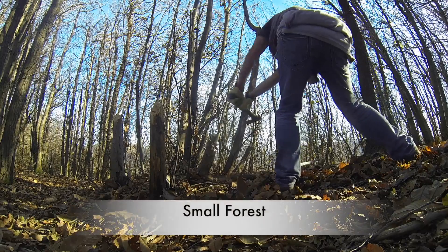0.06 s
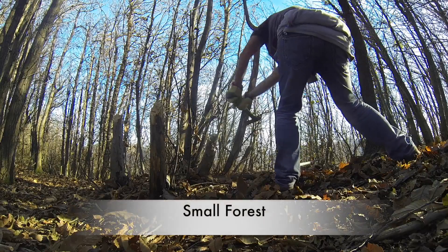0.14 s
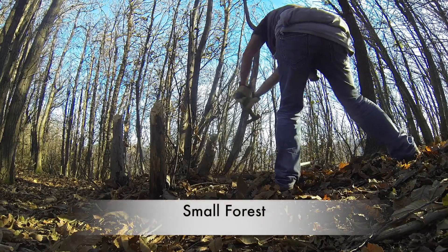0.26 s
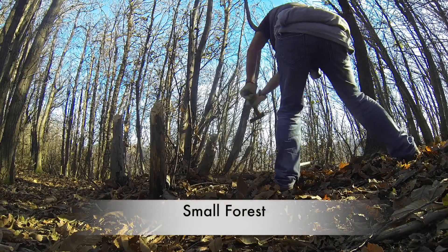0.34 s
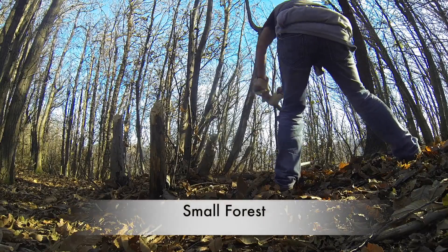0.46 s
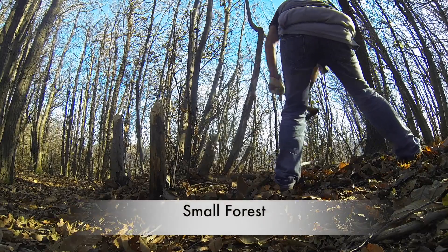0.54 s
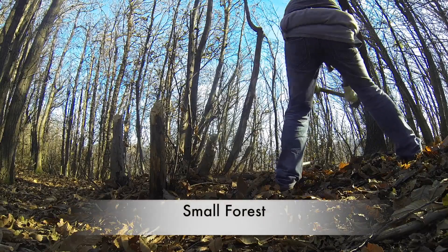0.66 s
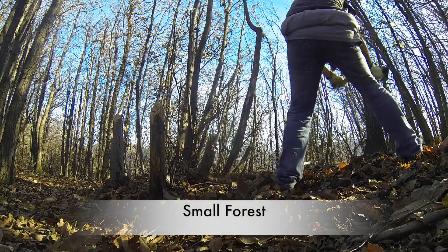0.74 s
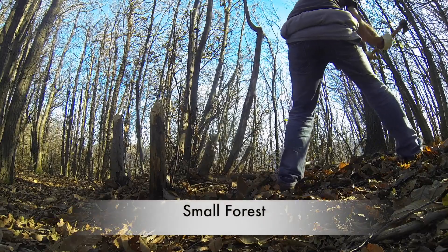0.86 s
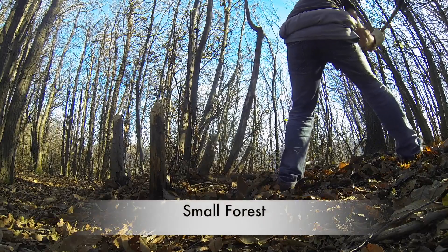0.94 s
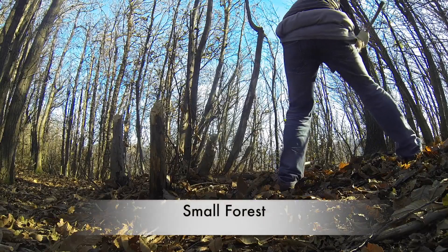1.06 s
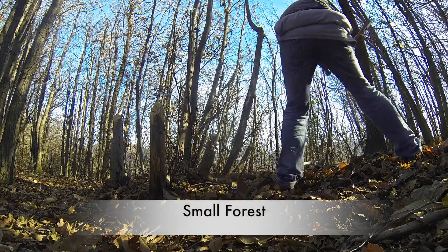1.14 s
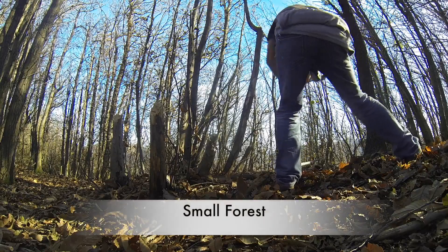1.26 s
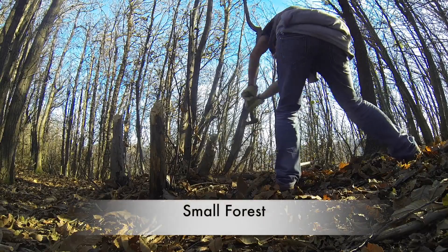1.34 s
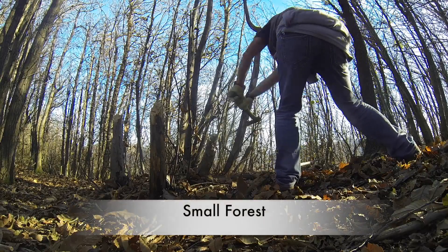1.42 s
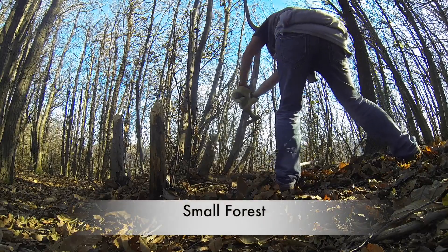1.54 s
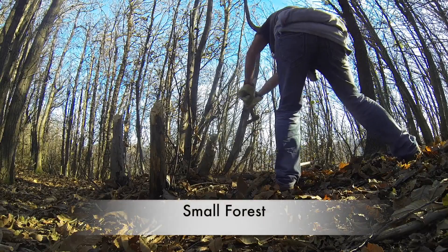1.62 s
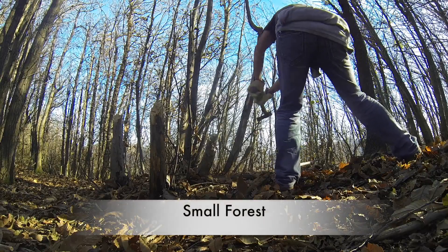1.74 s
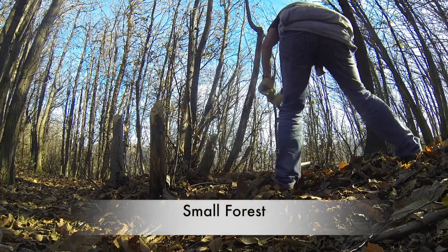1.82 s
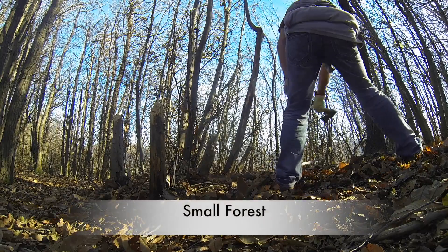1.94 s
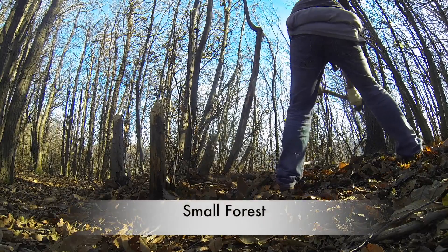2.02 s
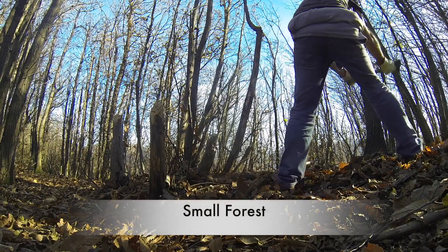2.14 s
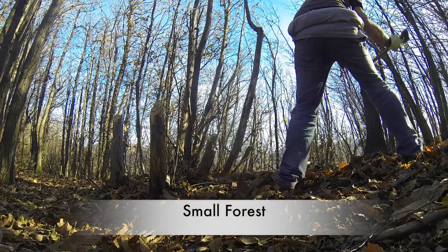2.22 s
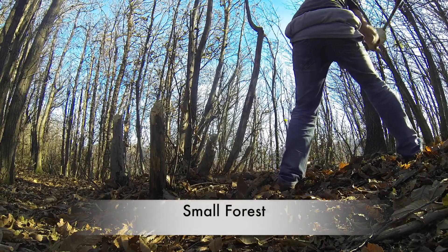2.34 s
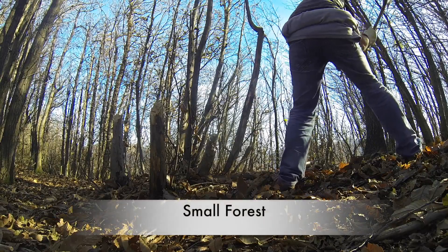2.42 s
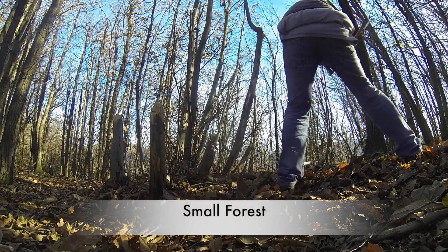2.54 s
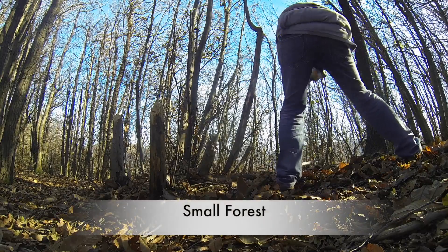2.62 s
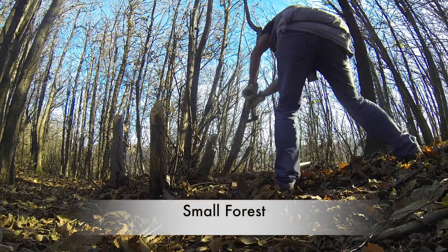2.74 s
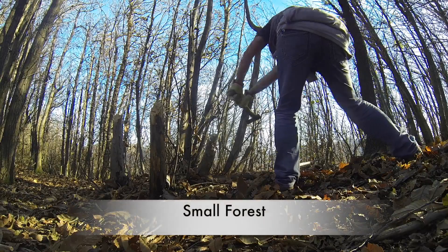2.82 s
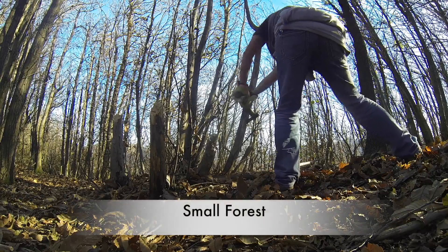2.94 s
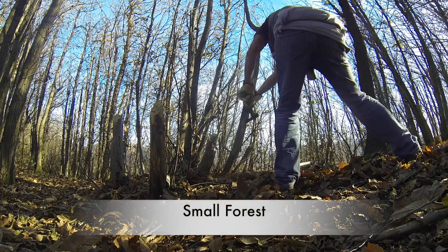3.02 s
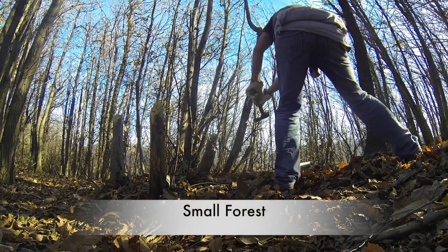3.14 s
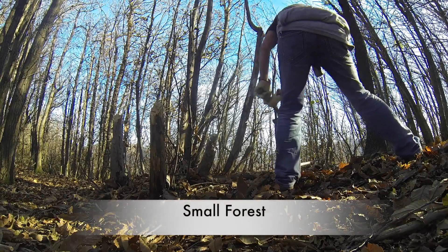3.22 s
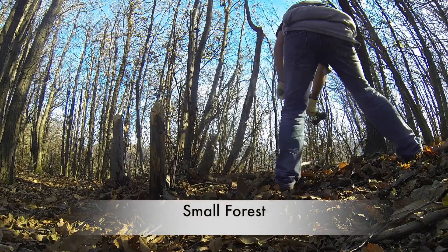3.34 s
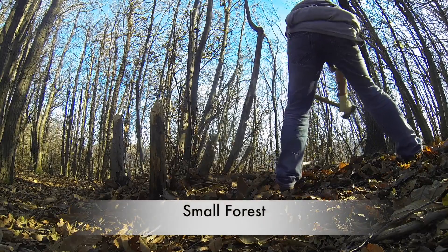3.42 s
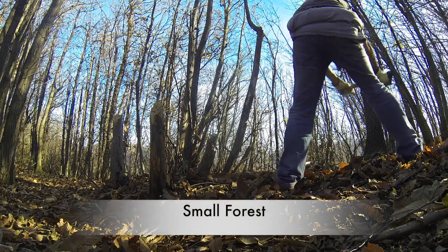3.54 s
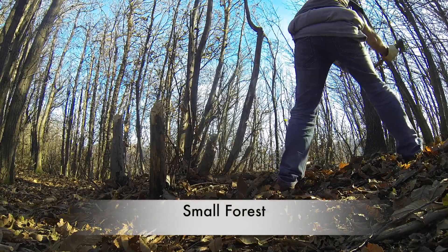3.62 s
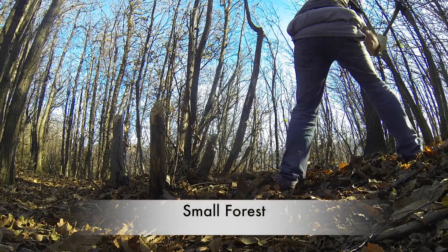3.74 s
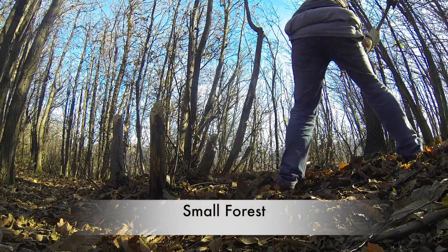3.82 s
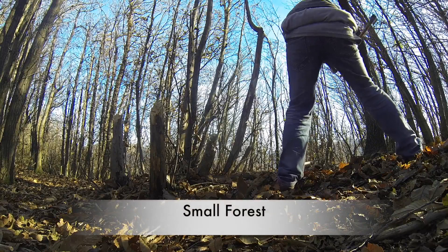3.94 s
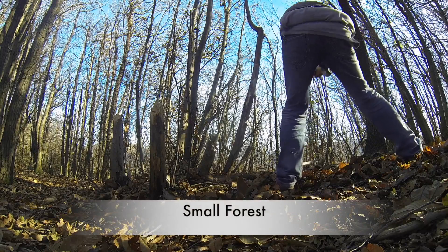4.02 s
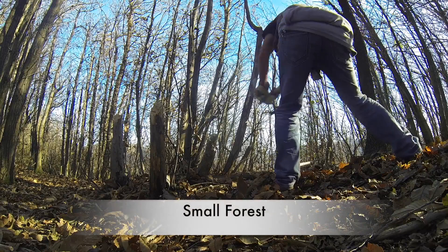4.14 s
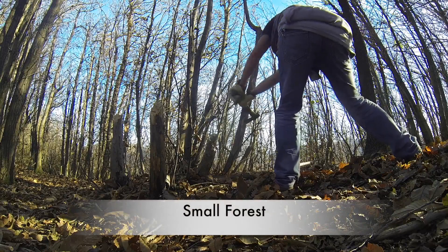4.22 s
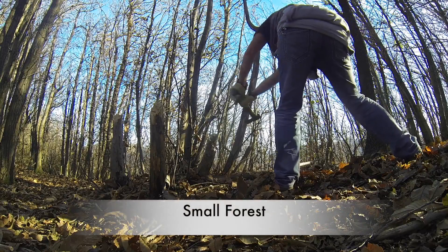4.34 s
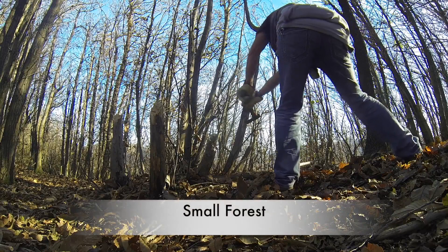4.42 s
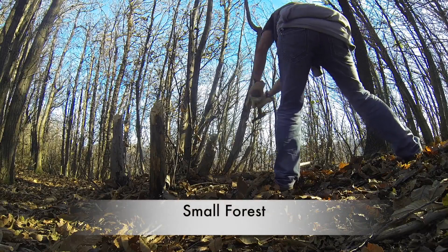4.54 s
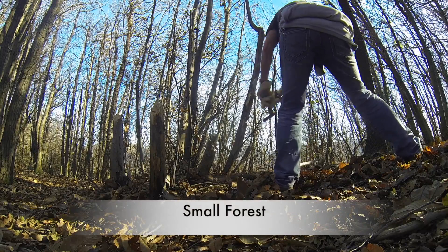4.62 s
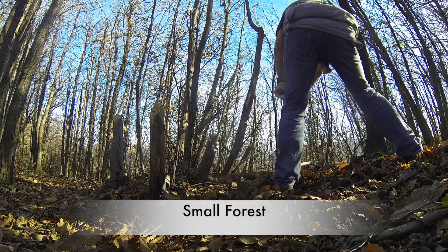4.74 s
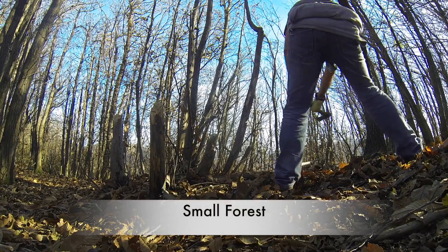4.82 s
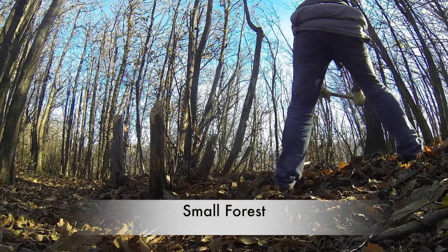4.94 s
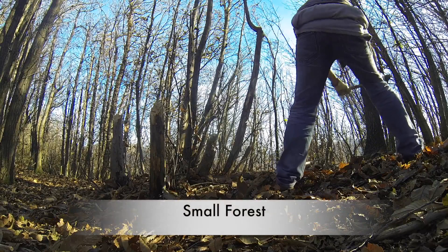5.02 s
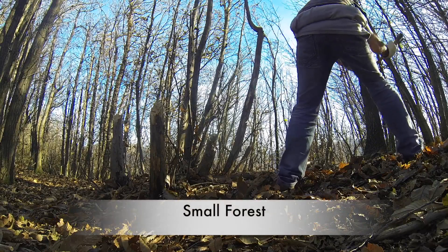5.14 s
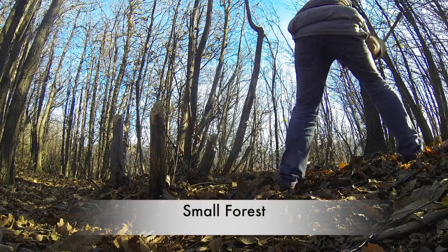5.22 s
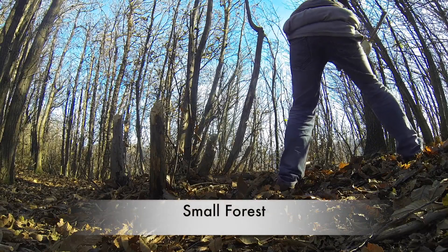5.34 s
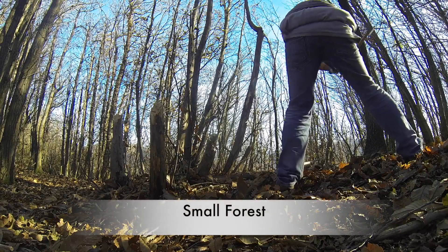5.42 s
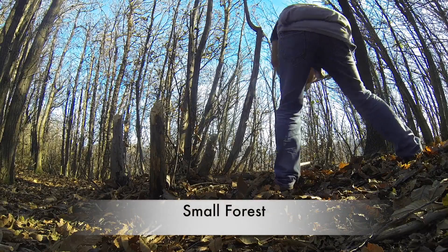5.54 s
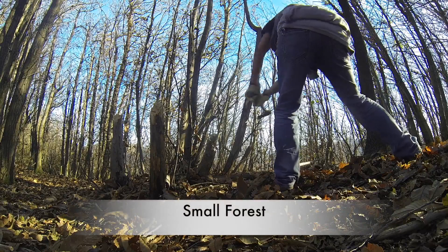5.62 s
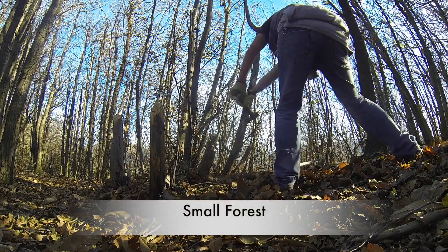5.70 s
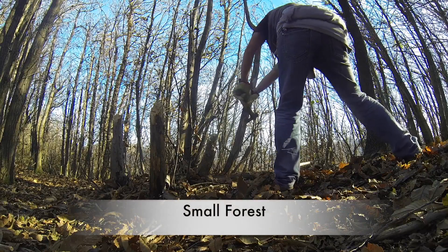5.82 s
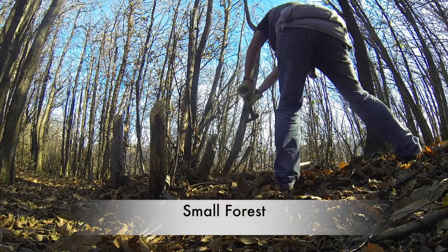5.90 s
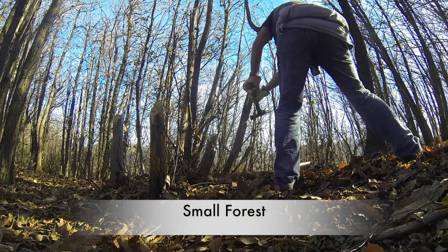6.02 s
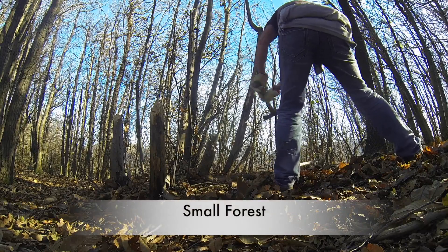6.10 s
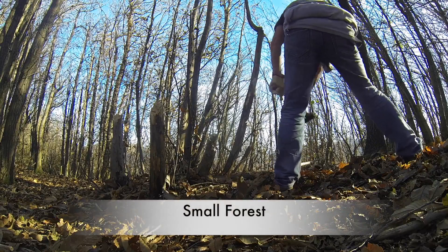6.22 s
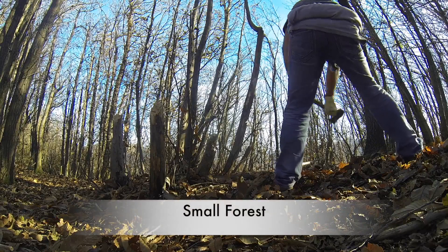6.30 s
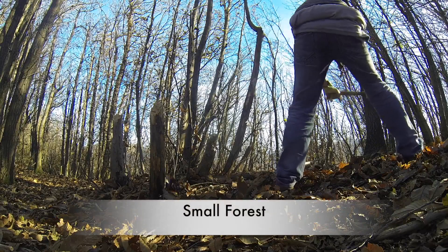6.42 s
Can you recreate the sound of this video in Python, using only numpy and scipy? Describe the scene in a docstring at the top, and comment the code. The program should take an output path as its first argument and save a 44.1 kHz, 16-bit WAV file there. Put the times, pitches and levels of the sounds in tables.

```python
"""Axe in a quiet forest

Five chops into standing wood, heard close by through a small camera's microphone on the ground.
Each bite is a noise burst ringing the cut face; stump and soil thud as decaying sines, and shaped noise dies
among the trunks. Chips, twigs and the handle are clicks through resonances; dry leaves underfoot are crackling noise.
Behind lie a far noise rumble, one faint two-note hoot of sines and a thin sine whine from the camera electronics.
Levels are in dB re full scale as each layer enters the microphone, ahead of housing and top-band losses."""
import sys
import numpy as np
from scipy import signal
from scipy.fft import rfft, irfft, next_fast_len
from scipy.io import wavfile
from scipy.ndimage import uniform_filter1d, map_coordinates

SR = 44100
rng = np.random.default_rng(int(sys.argv[2]) if len(sys.argv) > 2 else 0)


def elevation(decibels):
    """Turn decibel levels (scalar or array-like) into linear amplitude ratios."""
    levels = np.asarray(decibels, float)
    return 10 ** (levels / 20)


def generate_wav(sig):
    """Save sig (samples, or channels by samples) to the path in sys.argv[1] as 16-bit PCM at SR."""
    pcm = np.round(np.clip(np.atleast_2d(sig).T, -1, 1) * 32767).astype(np.int16)
    wavfile.write(sys.argv[1], SR, pcm)


N = 285327  # samples


def unit(x):
    """Scale to rms 1."""
    return x / np.sqrt(np.mean(x ** 2) + 1e-20)


def along(points, hz):
    """Read (Hz, value) points on a log frequency axis."""
    f, v = np.transpose(points)
    return np.interp(np.log(hz + 1), np.log(f + 1), v)


def wobble(rate):
    """A smooth random curve, rate knots a second."""
    knots = rng.standard_normal(int(N * rate / SR) + 4)
    return map_coordinates(knots, [np.arange(N) * rate / SR])


def filtered(x, response):
    """Filter x by a complex response of frequency."""
    n = x.shape[-1]
    m = next_fast_len(n + 8192)
    spectrum = rfft(x, m) * response(np.fft.rfftfreq(m, 1 / SR))
    return irfft(spectrum, m)[..., :n]


def resonance(hz, width):
    """A causal resonance with gain 1 at its centre; width in Hz."""
    return lambda f: 1j * f * width / (hz * hz - f * f + 1j * f * width)


def add(track, s, sound):
    """Mix a sound in at s seconds."""
    part = track[round(s * SR):][:len(sound)]
    part += sound[:len(part)]


# Far rumble below the forest. Each row: frequency in Hz, relative density in dB per Hz.
RUMBLE_COLOUR = [(12, -34.5), (20, -0.5), (70, -0.5), (145, -6.5), (195, -4), (255, -11), (358, -14),
                 (528, -29), (700, -25.5), (910, -37.5), (1540, -120)]
RUMBLE_DB = -51  # rms, before the slow swell


def far_rumble():
    """Low coloured noise from far off, swelling by about 1 dB."""
    rumble = unit(filtered(rng.standard_normal(N), lambda f: elevation(along(RUMBLE_COLOUR, f))))
    return elevation(RUMBLE_DB) * rumble * elevation(wobble(2))


# Camera electronics, right at the microphone: frequency in Hz, middling peak level in dB.
WHINE_TONE = (14050, -79)


def electronic_whine():
    """A thin steady-pitched sine with an unsteady level."""
    hz, db = WHINE_TONE
    return elevation(db + 3 * wobble(25)) * np.sin(2 * np.pi * hz * np.arange(N) / SR)


# Two faint hooted notes. Each row: start in seconds, end in seconds, pitch in Hz, middling rms level in dB,
# rms level of the octave above in dB.
HOOT_NOTES = [(5.153, 5.308, 695, -69.5, -74.5), (5.419, 5.578, 640, -61, -74)]


def hoot():
    """Soft notes: a sine and its octave, faded in and out with a slight tremble."""
    out, t = np.zeros(N), np.arange(N) / SR
    for start, end, hz, db, octave_db in HOOT_NOTES:
        fade = np.clip(np.minimum(t - start, end - t) / 0.034, 0, 1)
        tremble = elevation(1.8 * wobble(30))
        # a sine peaks 3 dB above its rms
        note = elevation(db + 3) * np.sin(2 * np.pi * hz * t)
        note += elevation(octave_db + 3) * np.sin(4 * np.pi * hz * t)
        out += fade * tremble * note
    return out


# Colour of dry leaves at the microphone. Each row: frequency in Hz, relative density in dB per Hz.
LEAF_COLOUR = [(240, -31.5), (400, -4.5), (599, -6), (628, -12), (792, -6.5), (911, -5), (1360, -8.5),
               (2700, -9.5), (3860, -13), (6860, -1), (8390, -0.5), (12800, -19), (14400, -26.5),
               (15600, -37), (16400, -61.5)]
SPLIT_HZ = 4900  # dull leaf noise below, bright above


def leafy_noise(n):
    """Two noises of rms 1 in the colour of dry leaves: the dull part and the bright part."""
    high = lambda f: 1 / (1 + (SPLIT_HZ / (f + 1)) ** 8)
    colour = lambda f: elevation(along(LEAF_COLOUR, f)) * [1 - high(f), high(f)]
    dull, bright = filtered(rng.standard_normal((2, n)), colour)
    return unit(dull), unit(bright)


# Weight shifts on the leaves, a short crunch each. Each row: middle in seconds, half length in seconds,
# dull level in dB, bright level in dB.
FOOT_SHIFTS = [(0.675, 0.017, -51, -47), (1.878, 0.021, -55, -58), (1.943, 0.026, -72, -58.5),
               (2.027, 0.024, -58.5, -56), (3.273, 0.015, -63, -79.5), (3.362, 0.017, -70, -59),
               (6.396, 0.017, -55, -53.5)]
# Leaves underfoot, busy while the axe is pulled free and still at the top of the swing.
# Each row: time in seconds, amount of stir in dB.
LEAF_STIR = [(0.0, -65), (0.16, -65), (0.38, -60.5), (0.85, -58), (0.94, -59.5), (1.08, -67.5), (1.35, -66),
             (1.53, -63.5), (1.84, -64.5), (2.03, -59), (2.47, -67.5), (2.72, -68), (3.03, -54.5),
             (3.13, -56), (3.37, -56.5), (3.89, -68.5), (4.13, -69.5), (4.34, -62.5), (4.56, -62),
             (4.79, -62), (5.24, -66), (5.41, -70), (5.69, -66), (5.82, -62.5), (5.97, -60.5), (6.2, -64),
             (6.47, -63)]
STIR_MID_DB = -63.5  # middling stir
DULL_DB, DULL_GROWS = -62, 0.8  # level at middling stir, dB per dB of stir
BRIGHT_DB, BRIGHT_GROWS = -63.5, 1.1


def rustle():
    """Leaf noise follows the stir and the steps, with crackles of a few ms partly shared by dull and bright."""
    t = np.arange(N) / SR
    stir_db = np.interp(t, *np.transpose(LEAF_STIR)) - STIR_MID_DB + 1.7 * wobble(5.7)
    dull_step, bright_step = np.zeros((2, N))
    for middle, half, dull_db, bright_db in FOOT_SHIFTS:
        shift = np.exp(-((t - middle) / half) ** 2)
        dull_step += elevation(dull_db) * shift
        bright_step += elevation(bright_db) * shift

    rate = 110  # crackles a second in each of three trains
    strength = np.minimum(rng.exponential(size=(3, N)), 3)
    crackles = (rng.random((3, N)) < rate / SR) * strength
    decay = np.exp(-t[None, :800] / 0.0022)
    both, dull, bright = signal.fftconvolve(crackles, decay, axes=1)[:, :N]

    crunch, fizz = leafy_noise(N)
    crunch = unit((1 + 1.1 * both + 0.39 * dull) * crunch)
    fizz = unit((1 + 0.62 * both + 1.1 * bright) * fizz)
    dull_level = elevation(DULL_DB + DULL_GROWS * stir_db + 0.8 * wobble(6.7)) + dull_step
    bright_level = elevation(BRIGHT_DB + BRIGHT_GROWS * stir_db + 0.8 * wobble(29)) + bright_step
    return dull_level * crunch + bright_level * fizz


def contact(t60, colour):
    """A click and a weak ragged scrape, dying five times slower, through a resonance; peak 1."""
    t = np.arange(SR // 8) / SR
    ragged = elevation(2.5 * unit(uniform_filter1d(rng.standard_normal(len(t)), size=60)))
    shape = elevation(-60 * t / t60) + 0.27 * ragged * elevation(-60 * t / (5 * t60))
    onset = 1 - np.exp(-t / 0.00069)
    sound = filtered(shape * onset * rng.standard_normal(len(t)), colour)
    return sound / np.abs(sound).max()


# The handle in the grip at the top of each backswing. Each row: time in seconds, peak level in dB,
# gap to the second knock in seconds, peak level of the second knock in dB.
GRIP_KNOCKS = [(1.065, -34, 0.012, -36), (2.487, -37.5, .016, -39), (3.874, -35.5, .012, -44),
               (5.38, -37.5, 0.023, -45)]
# Resonances of the handle. Each row: frequency in Hz, width in Hz, relative level in dB.
HANDLE_MODES = [(302, 78, 7.5), (995, 170, 4.5), (1750, 370, -3.5), (2660, 260, -1.5), (7200, 4900, -13.5)]
GRIP_T60_S = 0.037  # of the click


def handle_knocks():
    """The handle slides and knocks twice, always with the same wooden resonances."""
    out = np.zeros(N)

    def handle(f):
        modes = enumerate(HANDLE_MODES)
        return sum((-1) ** k * elevation(db) * resonance(hz, width)(f) for k, (hz, width, db) in modes)

    for s, db, gap, second_db in GRIP_KNOCKS:
        start = s - 0.001
        add(out, start, elevation(db) * contact(GRIP_T60_S, handle))
        add(out, start + gap, elevation(second_db) * contact(GRIP_T60_S, handle))
    return out


# Chips and twigs landing in the leaves. Each row: time in seconds, leafy peak level in dB, leafy pitch in Hz,
# woody peak level in dB, woody pitch in Hz.
CHIP_LANDINGS = [(0.212, -23, 7290, -59, 1790), (0.326, -31, 8140, -44, 1210),
                 (0.444, -44, 6940, -52, 1510), (0.636, -36.5, 7740, -42, 1630),
                 (0.668, -33, 7200, -43, 890), (0.77, -33.5, 7900, -34, 4300),
                 (0.869, -50, 7010, -59, 1820), (1.272, -45.5, 7950, -53, 1520),
                 (1.623, -38, 7590, -35, 806), (2.104, -34, 7450, -39, 2850), (2.282, -49, 5340, -48, 3040),
                 (2.323, -63, 7310, -47, 2540), (2.98, -23.5, 7900, -22, 2130),
                 (3.028, -28, 7560, -33.5, 590), (3.083, -33, 7240, -36, 746),
                 (3.217, -26, 8700, -45, 1720), (3.33, -36.5, 7170, -44, 1810),
                 (3.348, -44, 7590, -38.5, 377), (3.516, -35.5, 6750, -62, 1750),
                 (3.645, -46, 5200, -48, 2620), (4.318, -45, 7370, -47.5, 1200),
                 (4.383, -37, 6600, -21, 2010), (4.402, -29, 7200, -30, 2240),
                 (4.452, -25, 7300, -27.5, 2000), (4.481, -51, 7000, -28, 240),
                 (4.495, -53, 7000, -28.5, 258), (4.515, -41, 8100, -48, 1020),
                 (4.675, -30, 6600, -38, 1810), (4.719, -41.5, 6800, -40.5, 2730),
                 (4.788, -40.5, 6700, -48.5, 2050), (5.012, -45.5, 8500, -60, 2500),
                 (5.166, -45.5, 7500, -54, 2500), (5.285, -45.5, 6700, -49.5, 2620),
                 (5.676, -44, 7300, -57.5, 2080), (5.856, -15.5, 7500, -26, 1990),
                 (6.06, -42, 8000, -54.5, 2440), (6.077, -42.5, 8000, -57, 2530),
                 (6.205, -41, 7020, -45, 2510), (6.116, -47.5, 7000, -58, 2500),
                 (6.363, -45, 9000, -57.5, 2500), (6.382, -37, 7500, -38.5, 2800)]
CHIP_T60_S = 0.011  # of the click


def chips():
    """Each landing ticks with a woody and a leafy resonance of its own."""
    out = np.zeros(N)

    def peaked(hz):
        narrow, broad, skirt = resonance(hz, 0.25 * hz), resonance(hz, 1.2 * hz), resonance(hz, 0.9 * hz)
        return lambda f: (narrow(f) + 0.5 * broad(f)) * skirt(f)

    for s, leafy_db, leafy_hz, woody_db, woody_hz in CHIP_LANDINGS:
        woody = elevation(woody_db) * contact(CHIP_T60_S, peaked(woody_hz))
        leafy = elevation(leafy_db) * contact(CHIP_T60_S, peaked(leafy_hz))
        add(out, s - 0.001, woody + leafy)
    return out


# The stump takes the blow. Each row: time in seconds, thud level in dB over the stump modes,
# extra level of the slowly dying modes in dB, relative level of the late rebound in dB.
THUD_BLOWS = [(0.1915, -0.8, 3.5, -15), (1.5191, -0.7, 0, -18), (2.923, -0.15, 1.5, -16),
              (4.3444, 2, 2, -15), (5.8140, 0.94, 3, -32)]
# Stump and soil. Each row: frequency in Hz, level in dB, t60 in seconds, direction of first swing.
STUMP_MODES = [(67.7, -24.3, 0.367, -1), (76.2, -20.1, 0.254, -1), (88.2, -25.0, 0.898, -1),
               (98.0, -21.4, 0.629, 1), (111.6, -12.6, 0.095, -1), (154.0, -5.9, 0.074, 1),
               (156.4, -17.7, 0.389, -1), (204.2, -26.8, 0.343, 1), (226.9, -14.2, 0.176, -1),
               (279.0, -13.3, 0.069, -1), (301.5, -12.0, 0.036, 1), (411.5, -36.9, 0.325, -1)]
# The stump is pushed again: early delay in seconds, early relative level in dB, late delay in seconds.
REBOUND_TIMING = (.01595, -8.5, .1053)
STILL_S = 0.32  # the ringing is damped around this long after each push


def thuds():
    """The stump rings as decaying sines, nearly alike at every blow, and is pushed twice more."""
    out, t = np.zeros(N), np.arange(SR * 3 // 4) / SR
    hz, level, t60, swing = np.transpose(STUMP_MODES)[:, :, None]
    early, early_db, late = REBOUND_TIMING
    damping = 1 / (1 + np.exp((t - STILL_S) / 0.015))
    for s, db, slow_db, late_db in THUD_BLOWS:
        strength = level + db + rng.normal(0, 0.3, hz.shape)
        strength[t60 > 0.5] += slow_db
        modes = swing * elevation(strength - 60 * t / t60) * np.sin(2 * np.pi * hz * t) * damping
        thud = modes.sum(axis=0)
        dull_knock = (modes * (t60 < 0.2)).sum(axis=0)
        add(out, s, thud)
        add(out, s + early, elevation(early_db) * thud)
        add(out, s + late, elevation(late_db) * dull_knock)
    return out


# Colour of the echo among the trunks. Each row: frequency in Hz, relative density in dB per Hz.
ECHO_COLOUR = [(180, -48.5), (300, 4.5), (713, -20.5), (1230, -11), (1750, -23), (2740, -23), (4300, -33),
               (7320, -22), (10600, -32), (14200, -51.5), (16000, -82.5)]
# How the trunks let it die. Each row: frequency in Hz, t60 in seconds.
TRUNK_DECAY = [(300, 0.25), (700, 0.35), (1800, 0.18), (5000, 0.42), (12000, 0.095)]
ECHO_DB = -22.5  # rms of the echo noise before it decays


def trunk_echoes():
    """The echo of the crack is noise that dies band by band, new and lumpy at each blow."""
    out, t = np.zeros(N), np.arange(SR * 3 // 4) / SR
    for s, *_ in THUD_BLOWS:
        noise = unit(filtered(rng.standard_normal(len(t)), lambda f: elevation(along(ECHO_COLOUR, f))))
        f, frame, z = signal.stft(noise, SR, nperseg=256)
        lumps = uniform_filter1d(rng.standard_normal(z.shape), size=12, axis=0)
        lumps = unit(uniform_filter1d(lumps, size=2, axis=1))
        decay_db = -60 * frame / along(TRUNK_DECAY, f)[:, None]
        tail = signal.istft(z * elevation(2.1 * lumps + decay_db), SR, nperseg=256)[1][:len(t)]
        add(out, s, elevation(ECHO_DB) * tail * (1 - np.exp(-t / 0.0003)))
    return out


# The blade bites, close to the microphone. Each row: time in seconds, then peak levels in dB of thump, knock,
# clack and snap, and the level in dB of the splinter noise at the top of its burst.
BLADE_BITES = [(0.1886, -17.5, -3.5, 1, -7, -10.5), (1.518, -14.5, -13.5, -8, -3.5, -17),
               (2.919, -20, -10.5, -3, -2, -16), (4.344, -6, -4.5, -6, -29, -20.5),
               (5.813, -13.5, -4, -8.5, -9, -18)]
# The cut face, rows for thump, knock, clack and snap. Each row: frequency in Hz, width in Hz,
# delay in seconds, rise in seconds, fall in seconds.
CUT_FACE = [(544, 340, 0, 0.006, .015), (1161.5, 200, 0.00088, .0016, 0.01),
            (1946, 230, 0.00029, 0.001, 0.002), (3004, 390, 0.0017, 0.00068, 0.004)]


def bites():
    """Fibres tear for a few ms: noise bursts ring the cut face, each resonance with its own timing."""
    out, t = np.zeros(N), np.arange(SR // 4) / SR

    def burst(start, rise, fall):
        u = np.maximum(t - start, 0)
        return u / rise * np.exp(1 - u / rise) + 0.033 * (u > 0) * np.exp(-u / fall)

    # nearby trunks return the colour of the blow
    nearby = elevation(-32.5 - 60 * t / 0.41) * (1 - np.exp(-t / 0.003))
    for s, *levels, splinter_db in BLADE_BITES:
        for (hz, width, *timing), level_db in zip(CUT_FACE, levels):
            tearing = burst(*timing)
            noise = (tearing + nearby) * rng.standard_normal(len(t))
            # part of the tearing keeps step with the wood
            steady = 0.96 * np.sin(2 * np.pi * hz * t) / np.sqrt(width / 60)
            ring = filtered(noise + 0.3 * tearing * steady, resonance(hz, width))
            add(out, s, elevation(level_db) * ring / np.abs(ring).max())
        splinters = burst(0.0006, 0.0015, 0.018) * leafy_noise(len(t))[1]
        add(out, s, elevation(splinter_db) * splinters)
    return out


HOUSING_HZ = 10700  # the housing dulls the treble above this


def housing(sharp):
    """Two equal second-order low-passes in a row dull the sharp sounds."""
    return filtered(sharp, lambda f: 1 / (1 - (f / HOUSING_HZ) ** 2 + 1.2j * f / HOUSING_HZ) ** 2)


def scene():
    """Background, leaves and stump, with the sharp sounds heard through the housing."""
    background = far_rumble() + electronic_whine() + hoot()
    sharp = housing(handle_knocks() + chips() + bites())
    return (background + rustle() + thuds() + trunk_echoes() + sharp)[None]


def band_limit(x):
    """A steep low-pass at the top of the band."""
    return signal.sosfilt(signal.butter(12, 16510, fs=SR, output="sos"), x)


HISS_DB = -69  # preamplifier hiss, rms before the top band is cut


def record(dry):
    """Preamplifier hiss is added, the top band is cut and the loudest swings are rounded off at full scale."""
    hissing = dry + elevation(HISS_DB) * rng.standard_normal(dry.shape)
    top_cut = filtered(hissing, lambda f: 1 / np.sqrt(1 + (f / 13000) ** 12))
    rounded = top_cut / (1 + np.abs(top_cut) ** 10) ** (1 / 10)
    return band_limit(rounded)


dry = scene()
out = record(dry)
generate_wav(out)
```